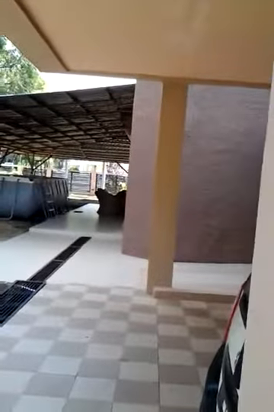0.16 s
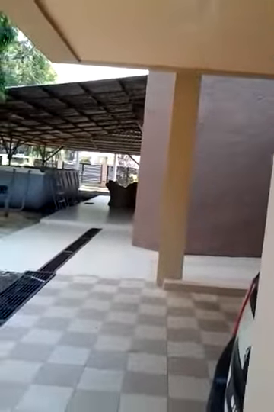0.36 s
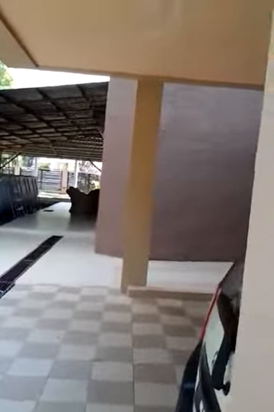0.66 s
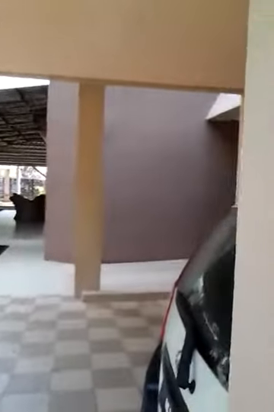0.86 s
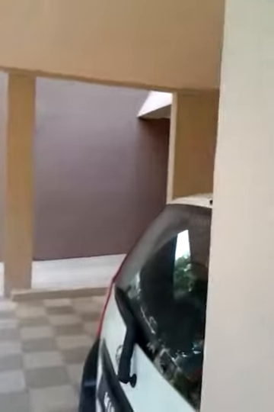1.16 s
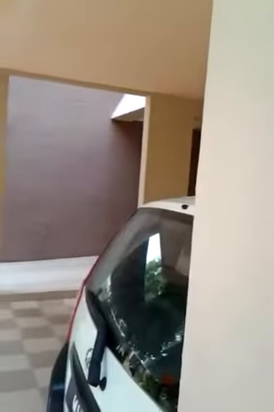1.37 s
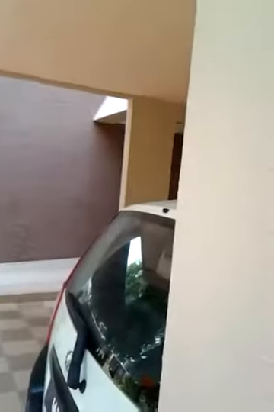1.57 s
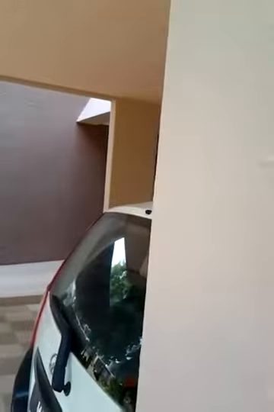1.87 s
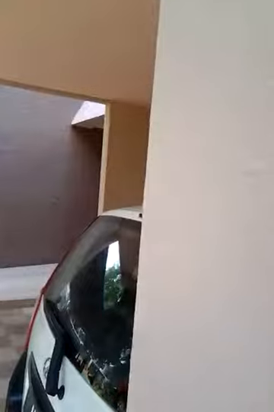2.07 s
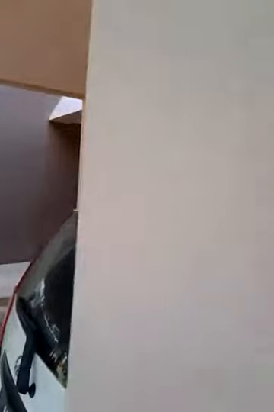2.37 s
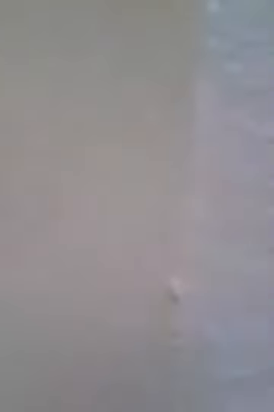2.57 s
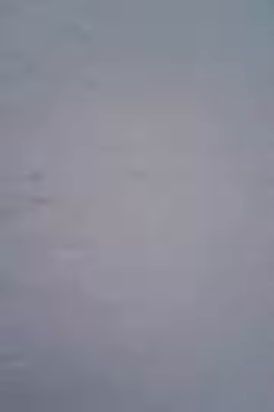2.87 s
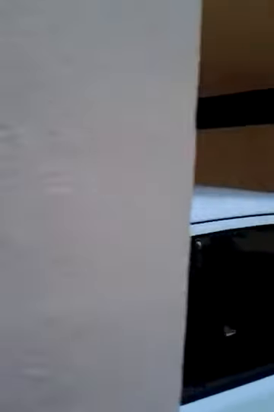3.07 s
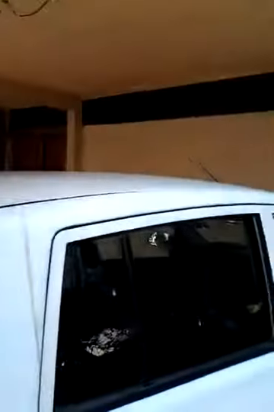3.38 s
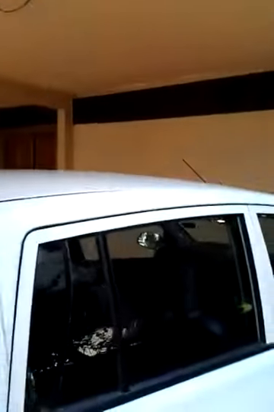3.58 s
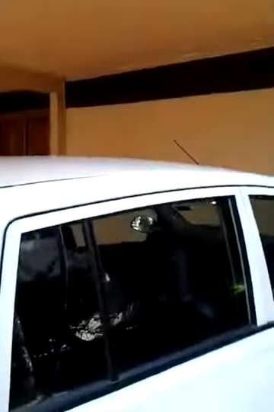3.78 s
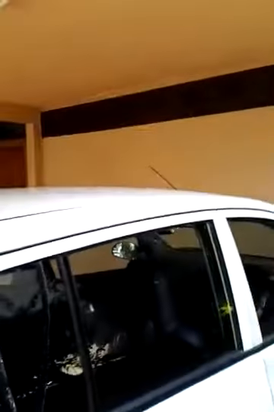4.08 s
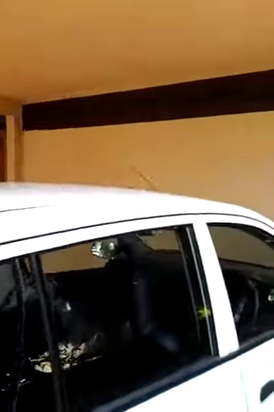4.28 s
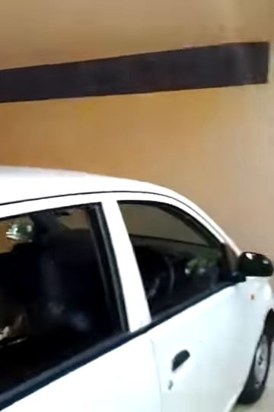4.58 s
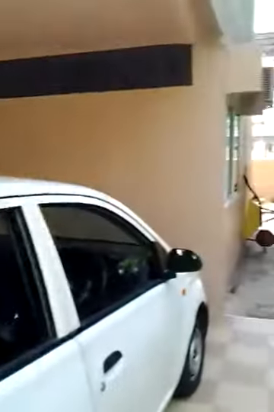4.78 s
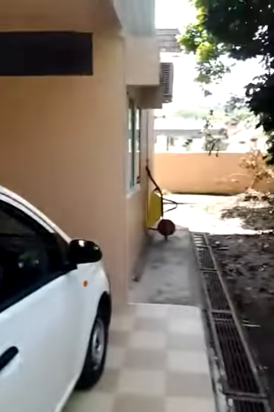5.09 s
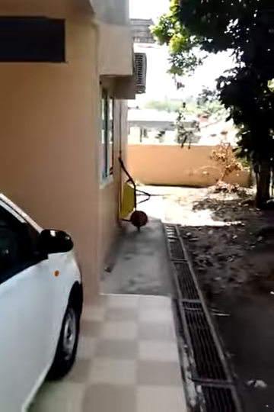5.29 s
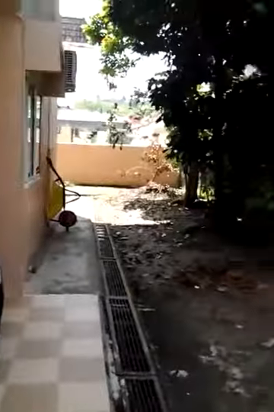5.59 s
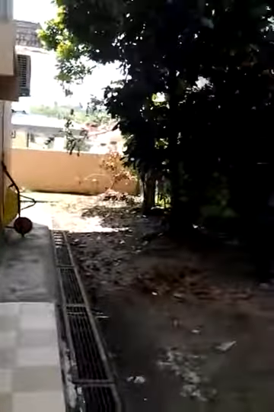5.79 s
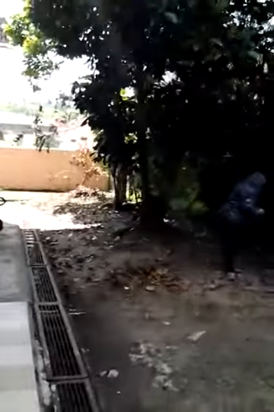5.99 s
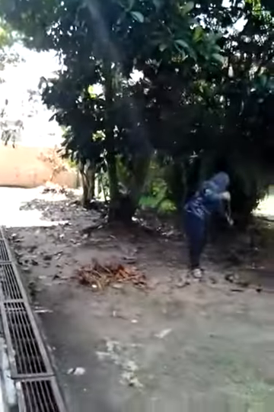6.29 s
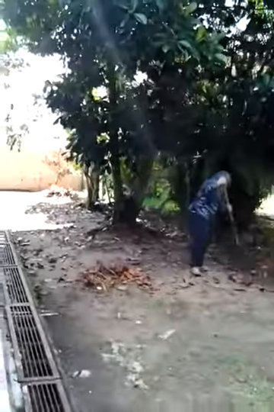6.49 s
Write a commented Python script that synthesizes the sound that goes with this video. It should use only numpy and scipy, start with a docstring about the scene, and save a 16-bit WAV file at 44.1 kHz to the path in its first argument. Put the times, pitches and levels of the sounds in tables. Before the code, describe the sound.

A wire rake is pulled through dry leaves on hard dirt, heard at some distance from a tiled carport by a handheld stereo microphone. A strong crackling scrape is already under way at 0 seconds, with knocks and twig snaps until about 0.35, then leaves settle with small clicks. After a faint scratch near 0.6, a firm stroke at 1.0 to 1.2 ends in a sharp snap and a tiny, quickly dying ring of wires on stone. Further scrapes come near 1.9 and 2.7, with a weak one at 3.2. From 3.65 strokes crowd closer, with tine clatter at 3.9, hard snaps at 4.4 and a longer drag at 4.75. Short crunchy strokes follow at 5.05, 5.35 and 5.5, then a lull, then a last scrape from about 6.2 with a closing snap at 6.5. Hollow low rubbing, short reflections and faint smooth yard hiss lie underneath.

```python
"""Dry leaves crackle and fizz as a wire rake is dragged through them in strokes over hard dirt.
Tines chatter, twigs snap and struck wires ring: random clicks and short dying tones make these sounds.
Bumps in the dirt shake the rake and a hollow under the heap, through resonances that can glide.
Reflections of a tiled carport blur it all, over a faint far yard hiss made of smooth noise.
The handheld two-port microphone turns slowly towards the rake."""
import sys
import numpy as np
from scipy import signal
from scipy.fft import rfft, irfft
from scipy.io import wavfile
from scipy.ndimage import uniform_filter1d, map_coordinates

SR = 44100
rng = np.random.default_rng(int(sys.argv[2]) if len(sys.argv) > 2 else 0)


def output_pcm(signal):
    """Save a mono or channel-first signal as 16-bit PCM at the path in sys.argv[1].

    Samples are clipped to [-1, 1] before scaling.
    """
    pcm = np.clip(np.atleast_2d(signal).T, -1, 1) * 32767
    wavfile.write(sys.argv[1], SR, np.round(pcm).astype(np.int16))


N = 292824  # length in samples
STEP = 32  # stroke envelopes are worked out once every 32 samples

# Pulls of the rake through the leaves, with levels before mixing.
# Each row: start in seconds, rise in seconds, hold in seconds, crackle level in dB, swell over the hold
# in dB, tine chatter against crackle in dB, leaf crispness against crackle in dB.
LEAF_STROKES = [(0.0, 0.023, 0.13, -29.5, 0.5, -4, -13.5), (0.126, 0.011, 0.0042, -33, 7, -11, -12),
                (0.58, 0.095, 0.0059, -48, -6, 5.5, -10), (1.035, 0.024, 0.12, -32, 4.5, -4.5, -12.5),
                (1.536, 0.027, 0.0092, -43, -3, -6, -13), (1.893, 0.0049, 0.21, -35, -3.5, -2.5, -14),
                (1.937, 0.1, 0.19, -33.5, -7.5, -5, -9), (2.394, 0.047, 0.018, -46.5, 2, -4, -18),
                (2.634, 0.1, 0.14, -33.5, 5.5, -9.5, -8), (3.166, 0.031, 0.16, -46, -6.5, -2, -16),
                (3.652, 0.012, 0.07, -39.5, 10, -3.5, -10.5), (3.829, 0.0041, 0.022, -36.5, 1.5, -24, -15),
                (4.038, 0.11, 0.074, -36.5, -4, -5, -8), (4.236, 0.062, 0.19, -35, -9, -10, -10.5),
                (4.393, 0.021, 0.032, -34.5, -20, 8.5, -24), (4.716, 0.058, 0.19, -33, 4, -10, -13),
                (5.034, 0.036, 0.0098, -49, -13, 16, -20), (5.331, 0.0042, 0.025, -27, -8.5, -5, -8.5),
                (5.49, 0.011, 0.025, -30, -1, -12, -8), (5.818, 0.024, 0.0099, -52.5, -4.5, 0, 0.5),
                (6.171, 0.0057, 0.11, -42.5, 2, -18, -9.5), (6.236, 0.056, 0.17, -32, 5.5, -2, -10.5)]
# After a pull the leaves settle slowly: rise in dB, quick fall in dB per second,
# level of the settling in dB, its slow fall in dB per second.
LEAF_SHAPE = (14, 80, -17, 29.5)
# Sound colour of the leaf crackle. Each row: frequency in Hz, level in dB per Hz.
LEAF_SPECTRUM = [(350, -23), (600, -3), (859, -2.5), (1020, -5.5), (1170, -2.5), (1280, -1), (2090, 0),
                 (2870, 0), (4110, 3.5), (7500, -16), (9750, -30), (16500, -120)]
# Sound colour of the crisp leaf fizz. Each row: frequency in Hz, level in dB per Hz.
FIZZ_SPECTRUM = [(3240, -4.5), (5500, 4.5), (7000, -4), (8120, -5), (9550, -6.5), (11000, -9.5),
                 (12800, -7.5), (15700, -32)]
# Resonances of the tines. Each row: pitch in Hz, width in Hz, level in dB.
TINE_MODES = [(1270, 470, 2.5), (1610, 240, 1), (1853, 233, 2.5), (2062, 130, 1.5), (3700, 350, -0.5)]

# The rake head dragging on dirt, with levels before mixing.
# Each row: start in seconds, rise in seconds, hold in seconds, level in dB, swell over the hold in dB,
# hollow resonance at the start in Hz, its glide in Hz per second.
DRAG_STROKES = [(0.0, 0.00087, 0.15, -33, 1, 461, 100), (0.123, 0.044, 0.18, -37, -8.5, 463, -500),
                (0.894, 0.013, .13, -50, 16, 435, 48), (1.059, 0.012, 0.11, -39, 9.5, 437, 298),
                (1.871, 0.047, 0.072, -31.5, 3.5, 440, 114), (2.006, 0.016, 0.073, -39, -1.5, 440, -300),
                (2.624, 0.057, 0.27, -38.5, 1.5, 455, -100), (3.61, 0.027, 0.17, -45, 6, 480, -200),
                (4.068, 0.076, 0.013, -43.5, 0.5, 386, -100), (4.247, 0.078, 0.14, -37.5, -8.5, 446, -100),
                (4.408, 0.034, 0.041, -46, 2.5, 320, -700), (4.684, 0.02, 0.24, -45.5, 5.5, 247, 300),
                (5.039, 0.031, 0.055, -33, -5.5, 393, -1600), (5.365, 0.04, 0.0087, -40.5, -5, 464, -59.5),
                (5.497, 0.016, 0.096, -47.5, 5, 470, -500), (6.133, 0.22, 0.13, -43.5, 6.5, 410, 1)]
DRAG_SHAPE = (18.5, 156, -14.5, 67)  # same order as LEAF_SHAPE
# Resonances of the handle and head. Each row: pitch in Hz, width in Hz, level in dB.
BODY_MODES = [(204.3, 11.2, -3.5), (375.1, 7.8, 4), (463, 124, -3.5), (577, 70, -6), (798, 130, 0.5)]

# Snaps and knocks, with levels before mixing. Each row: start in seconds, level in dB, pitch in Hz,
# time for the ring to fall 60 dB in seconds, crack of leaf bits against the snap level in dB.
SNAP_EVENTS = [(0.078, -19, 514, 0.033, -20), (0.093, -18, 520, 0.027, -3.5),
               (0.141, -9.5, 2400, 0.024, -4.5), (0.172, -16, 485, 0.014, -26),
               (0.213, -34, 4060, 0.014, -17), (0.268, -13, 1680, 0.02, -13),
               (0.281, -15.5, 1860, 0.011, -5), (0.302, -15, 1430, 0.015, -12),
               (0.318, -15, 2200, 0.024, -2.5), (0.46, -18, 860, 0.009, -19),
               (0.468, -17, 810, 0.015, -4.5), (0.517, -34.5, 950, 0.024, 7.5),
               (0.679, -25.5, 1250, 0.014, -7), (0.697, -25, 1860, 0.016, -12),
               (0.713, -31, 1690, 0.022, -15), (0.94, -38, 470, 0.032, -27), (0.972, -30, 500, 0.023, -12),
               (0.995, -24.5, 497, 0.015, -13), (1.013, -23, 474, 0.017, -9.5),
               (1.033, -20.5, 440, 0.017, -11), (1.043, -18, 4200, 0.0081, -18),
               (1.101, -20, 450, 0.02, -13), (1.134, -23, 480, 0.0078, -17), (1.163, -13, 463, 0.029, -27),
               (1.176, -2, 3590, 0.017, -18), (1.369, -21.5, 2050, 0.015, -4),
               (1.765, -38.5, 402, 0.047, 1), (1.907, -11, 4220, 0.011, -24), (1.92, -27, 400, 0.053, -22),
               (1.962, -22.5, 470, 0.047, -27), (2.028, -14, 1723, 0.016, -17),
               (3.649, -22, 1060, 0.014, -12), (3.885, -12, 2120, 0.0099, -27),
               (3.884, -21, 1490, 0.017, -25), (3.894, -23.5, 1820, 0.038, -26),
               (3.9, -23, 1750, 0.02, -24), (3.913, -19, 1684, 0.032, -9), (3.928, -24, 1830, 0.022, -28),
               (3.931, -17, 1600, 0.024, -22), (3.937, -18, 1920, 0.022, -3.5),
               (4.089, -25, 1120, 0.0087, -0.5), (4.137, -23.5, 720, 0.022, -2.5),
               (4.141, -17.5, 1270, 0.022, -22), (4.409, -8, 1880, 0.009, -14),
               (4.424, -4.5, 1770, 0.0071, -15.5), (4.727, -29, 820, 0.011, 1.5),
               (4.783, -21.5, 1980, 0.026, -5), (4.803, -22, 3700, 0.025, -18),
               (4.83, -29, 3550, 0.017, -11), (4.866, -13, 4440, 0.012, -14), (4.957, -24, 1170, 0.02, -8),
               (5.047, -24, 3730, 0.012, 1), (5.053, -21, 2040, 0.03, -8), (5.054, -26, 605, 0.027, -25),
               (5.333, -19, 1840, 0.018, -2.5), (5.408, -29.5, 3900, 0.016, 6.5),
               (5.5, -27, 560, 0.037, -16), (5.506, -17.5, 1800, 0.014, -12), (5.862, -26, 3370, 0.018, -8),
               (6.25, -35, 440, 0.059, -29), (6.279, -26, 2300, 0.021, -15), (6.325, -29, 390, 0.047, -22),
               (6.371, -34, 370, 0.19, -25), (6.409, -25, 450, 0.049, -22), (6.505, -1, 1420, 0.006, -28)]
# Tines striking a stone. Each row: start in seconds, level in dB before mixing.
STONE_STRIKES = [(1.178, -22), (1.188, -24), (1.212, -35), (1.232, -28), (1.265, -25)]
# Ringing of the struck wires, before a random change at each blow.
# Each row: pitch in Hz, level in dB, time to fall 60 dB in seconds.
WIRE_MODES = [(2120, -2.5, 0.054), (2960, -8, .07), (2736, 2.5, 0.035), (3545, -2, 0.049),
              (3710, -6, 0.049), (4070, -18, 0.05)]
# Dry bright ticks of a tine or a brittle leaf.
# Each row: start in seconds, level in dB before thinning, time to fall 60 dB in seconds.
TICK_EVENTS = [(0.028, -24.5, 0.033), (1.0442, -18.5, 0.02), (1.058, -23, .02), (1.0823, -22, 0.012),
               (1.107, -21, 0.013), (1.187, -16, 0.025), (1.3662, -18, 0.016), (1.908, -27, 0.02),
               (1.961, -21.5, .015), (2.699, -37, .015), (3.155, -28, 0.04), (3.669, -25, 0.018),
               (3.886, -36, 0.017), (4.279, -29, 0.018), (4.731, -34.5, 0.019), (5.337, -26, 0.017),
               (5.508, -29, 0.018)]
# Sound colour of the ticks. Each row: frequency in Hz, level in dB per Hz.
TICK_SPECTRUM = [(300, -50), (2000, 4.5), (4500, 13.5), (7000, -9), (10000, -20), (15000, -40)]

# How long the carport rings. Each row: frequency in Hz, time to fall 60 dB in seconds.
CARPORT_DECAY = [(200, 0.24), (1000, 0.13), (4000, 0.4), (12000, 0.28)]
# Sound colour of the yard. Each row: frequency in Hz, level in dB per Hz before the whole is leveled.
YARD_SPECTRUM = [(12, -44), (20, -10), (59, -21.5), (181, -1.5), (353, 2.5), (508, -0.5), (2110, -3.5),
                 (2780, -10), (3890, -6), (7390, -23), (8030, -27), (8730, -20), (12900, -20), (15700, -28)]
YARD_DB = -49.5  # overall yard level

# How alike the diffuse sound is at the two ports. Each row: frequency in Hz, likeness from -1 to 1.
PORT_LIKENESS = [(60, -0.53), (150, 0.82), (380, 0.76), (950, 0.036), (2380, 0.28), (5980, -0.1),
                 (15000, 0.42)]
# How far ahead the left port hears the rake. Each row: time in seconds, lead in milliseconds.
LEFT_LEAD = [(0, 0.12), (3.5, 0.12), (6.64, 0.064)]
# The microphone turns. Each row: time in seconds, left-right level difference in dB.
TURN_PAN = [(0, -1.3), (2.5, -1), (3.5, -0.5), (4.2, 0.5), (4.8, -0.8), (6.64, 0)]
# Difference in colour between the ports. Each row: frequency in Hz, left-right difference in dB.
PORT_BALANCE = [(60, -4), (180, 1.5), (550, 1.5), (1650, 3.5), (4970, 1), (15000, -2.5)]
EDGE_HZ = 15800  # top of the band that is let through


def leaves():
    """Breaking leaves crackle and fizz, and skipping tines chatter, along each stroke."""
    pulls = np.array([pull(*row[:5], *LEAF_SHAPE) for row in LEAF_STROKES])
    tine_db, crisp_db = np.transpose(LEAF_STROKES)[5:]
    cracks = clicks(3500, spread_db=2.0, clump_db=2.5, clump_s=0.025)
    skips = clicks(1500, spread_db=3.5, clump_db=0.5, clump_s=0.027)
    crackle = filled(pulls.sum(axis=0)) * colour(grains(cracks, 5.5), LEAF_SPECTRUM)
    fizz = filled(gain_of(crisp_db) @ pulls) * colour(cracks, FIZZ_SPECTRUM)
    chatter = filled(gain_of(tine_db) @ pulls) * ring(skips, TINE_MODES)
    return crackle + fizz + chatter


def drag():
    """Small bumps in the dirt shake the rake body and the hollow under the heap of leaves."""
    pulls = np.array([pull(*row[:5], *DRAG_SHAPE) for row in DRAG_STROKES])
    # the loudest pull at each moment sets the hollow
    start, *_, hz, glide = np.transpose(DRAG_STROKES)[:, pulls.argmax(axis=0)]
    glide_s = np.clip(np.arange(0, N, STEP) / SR - start, 0, .3)
    hollow_hz = filled(np.maximum(hz + glide * glide_s, 200))
    bumps = clicks(2000, spread_db=1.5, clump_db=1.6, clump_s=0.01)
    body = 1.01 * ring(bumps, BODY_MODES)
    hollow = resonate(bumps, hollow_hz, 166)
    overtone = 0.53 * resonate(bumps, 2.08 * hollow_hz, 150)
    return filled(pulls.sum(axis=0)) * evened(body + hollow + overtone)


def snaps():
    """Each snap is a short pitched ring with a noisy crack of broken leaf bits."""
    out, t = np.zeros(N), np.arange(3000) / SR
    grit = rng.standard_normal(N)
    bits, fizz = colour(grit, LEAF_SPECTRUM), colour(grit, FIZZ_SPECTRUM)
    for s, db, hz, t60, crack_db in SNAP_EVENTS:
        at = round(s * SR)
        tone = np.sin(2 * np.pi * hz * t)
        if hz > 600:  # higher snaps also have a weak lower tone
            tone = tone + 0.15 * np.sin(2 * np.pi * 0.564 * hz * t)
        crack = bits[at:at + len(t)] * gain_of(crack_db - 60 * t / 0.04)
        # the bright part is weaker but lasts longer
        crack += fizz[at:at + len(t)] * gain_of(crack_db - 19 - 60 * t / 0.058)
        ringing = tone * gain_of(-60 * t / max(t60, .004))
        soft_start = 1 - np.exp(-t / 0.0012)
        out[at:at + len(t)] += gain_of(db) * (ringing + crack) * soft_start
    return out


def strikes():
    """Struck wires ring as dying tones, with slightly different pitches and levels at each blow."""
    out, t = np.zeros(N), np.arange(12000) / SR
    chances = rng.standard_normal((len(STONE_STRIKES), len(WIRE_MODES)))
    for (s, db), chance in zip(STONE_STRIKES, chances):
        wires = np.zeros(len(t))
        for (hz, wire_db, t60), c in zip(WIRE_MODES, chance):
            tone = np.sin(2 * np.pi * hz * (1 + 0.0084 * c) * t)
            wires += gain_of(wire_db + 2.0 * c - 60 * t / t60) * tone
        out[round(s * SR):][:len(t)] += gain_of(db) * wires
    return out


def ticks():
    """Each tick is a burst of bright noise that starts at once and quickly dies away."""
    envelope, t = np.zeros(N), np.arange(2000) / SR
    for s, db, t60 in TICK_EVENTS:
        envelope[round(s * SR):][:len(t)] += gain_of(db - 60 * t / max(t60, .003))
    return envelope * colour(rng.standard_normal(N), TICK_SPECTRUM)


def carport(x, count=8):
    """Rake and listener move, so the sound passes through one set of reflections after another."""
    place = np.arange(N) / SR / .11  # a new set every 110 ms, returning to the first after the last
    out = np.zeros((2, N))
    for k in range(count):
        apart = (place - k + count / 2) % count - count / 2
        fade = np.cos(np.pi / 2 * np.clip(apart, -1, 1))
        out += signal.oaconvolve(x[None] * fade, reflections(), axes=1)[:, :N]
    return out


def reflections():
    """Sparse reflections off walls, tiles and car, each band dying at its own speed."""
    taps = np.zeros((2, SR // 2))
    # one reflection at a random place in every 20 samples
    at = np.arange(60, SR // 2 - 20, 20) + rng.integers(0, 20, (2, (SR // 2 - 61) // 20))
    np.put_along_axis(taps, at, rng.choice([-1., 1.], at.shape), 1)
    hz, t, z = signal.stft(taps, SR, nperseg=256)
    decay = gain_of(-60 * t / read(CARPORT_DECAY, hz)[:, None])
    tail = signal.istft(pair(*z, hz) * decay, SR, nperseg=256)[1]
    return tail / np.linalg.norm(tail, axis=1)[:, None]


def yard():
    """Far traffic and leaves in the air: smooth noise with faint drifting patches."""
    hz = np.fft.rfftfreq(1024, 1 / SR)
    a, b, c, d, patches = rng.standard_normal((N // 256 + 5, 513, 5)).T
    patches = uniform_filter1d(patches, size=12, axis=0)  # smooth across frequency
    patches = evened(uniform_filter1d(patches, size=14, axis=1))  # then across time
    level_db = read(YARD_SPECTRUM, hz)[:, None] + 1.4 * patches
    z = pair(a + 1j * b, c + 1j * d, hz) * gain_of(level_db)
    noise = signal.istft(z, nperseg=1024, noverlap=768)[1][:, :N]
    return gain_of(YARD_DB) * evened(noise)


def clicks(per_s, spread_db, clump_db, clump_s):
    """Random clicks, a few of them large, growing louder in clumps that start sharply and fade."""
    size = gain_of(spread_db * np.minimum(rng.exponential(1, N), 5)) * rng.choice([-1., 1.], N)
    starts = rng.exponential(1, N) * (rng.random(N) < 1 / (clump_s * SR))
    clumps = signal.lfilter([1], [1, -np.exp(-1 / (clump_s * SR))], starts)
    return size * (rng.random(N) < per_s / SR) * gain_of(clump_db * np.minimum(clumps, 4))


def grains(x, cycles, count=14):
    """Each click becomes a short burst at one of several pitches, as leaves differ in size."""
    kind, out = rng.integers(0, count, N), np.zeros(N)
    for k, hz in enumerate(np.geomspace(600, 7500, count)):
        turns = np.arange(0, cycles, hz / SR)
        burst = np.sin(np.pi * turns / cycles) ** 2 * np.sin(2 * np.pi * turns)
        # scaled so that every pitch is equally strong per Hz
        out += signal.oaconvolve(x * (kind == k), burst * hz / SR)[:N]
    return out


def ring(x, modes):
    """Each click sets a few damped resonances ringing, with a soft start."""
    t = np.arange(3000) / SR
    taps = np.zeros(len(t))
    for hz, width, db in modes:
        swell_and_fade = width ** 1.9 * t * np.exp(-2 * np.pi * width * t)
        taps += gain_of(db) * swell_and_fade * np.sin(2 * np.pi * hz * t)
    return evened(signal.oaconvolve(x, taps)[:N])


def resonate(x, hz, width):
    """A moving resonance: shift its pitch down to zero, smooth twice, shift back."""
    turn, r = np.exp(2j * np.pi * np.cumsum(hz) / SR), np.exp(-np.pi * width / SR)
    smooth = signal.lfilter([1], [1, -2 * r, r * r], x / turn + 1e-18)
    return evened((turn * smooth).real)


def pull(start, rise, hold, db, swell_db, rise_db, fall_db, settle_db, slow_db):
    """Gain of one pull: rise, hold with a swell, quick fall, and a faint slow settling."""
    t = np.arange(0, N, STEP) / SR - start
    after = np.maximum(t - rise - hold, 0)
    shape_db = np.interp(t, [0, rise, rise + hold], [db - rise_db, db, db + swell_db])
    fall = gain_of(-fall_db * after) + gain_of(settle_db - slow_db * after)
    return (t >= 0) * gain_of(shape_db) * fall


def filled(curve):
    """Spreads a coarse envelope over every sample."""
    return np.interp(np.arange(N), np.arange(0, N, STEP), curve)


def colour(x, points):
    """Gives a sound the wanted spectrum with a filter that never responds ahead of its input."""
    level_db = read(points, abs(np.fft.fftfreq(4096, 1 / SR)))
    log_gain = np.log(gain_of(np.maximum(level_db, -100)))
    # minimum phase puts the filter's energy as early as possible
    taps = np.fft.ifft(np.exp(np.conj(signal.hilbert(log_gain)))).real[:2048]
    return evened(signal.oaconvolve(x, taps)[:N])


def pair(a, b, hz):
    """Mixes two spectra so the ports are as alike at each frequency as PORT_LIKENESS says."""
    same = np.clip(read(PORT_LIKENESS, hz), -1, 1)[:, None]
    return np.array([a, same * a + np.sqrt(1 - same ** 2) * b])


def ports(x, lead_ms):
    """Sound reaches the first port lead_ms milliseconds before the second."""
    late = np.arange(N) - lead_ms * SR / 1000
    return np.array([x, map_coordinates(x, [late], order=3)])


def read(points, hz):
    """Reads a table of values on a log-frequency axis."""
    f, value = np.transpose(points)
    return np.interp(np.log(hz + 1), np.log(f + 1), value)


def gain_of(db):
    """Turns decibels into amplitude."""
    return 10 ** (np.asarray(db) / 20)


def evened(x):
    """Scales to an average (rms) level of 1."""
    return x / np.sqrt(np.mean(x ** 2) + 1e-20)


def scene():
    """Adds direct sound, the diffuse carport and the yard."""
    t = np.arange(N) / SR
    thin = signal.butter(6, 165, "high", fs=SR, output="sos")  # small sources give out no bass
    sources = [leaves() + drag(), snaps() + strikes(), leaves(), ticks()]
    scrape, hits, far, bright = signal.sosfilt(thin, sources)
    lead_ms = np.interp(t, *np.transpose(LEFT_LEAD))
    direct = ports(gain_of(-6.5) * scrape + hits + bright, lead_ms)
    # leaves at the far end of the heap reach the right port first
    scattered = gain_of(-8.5) * ports(far, np.full(N, .2))[::-1]
    wet = gain_of(-4.0) * carport(scrape + gain_of(2.0) * hits)
    pan_db = np.interp(t, *np.transpose(TURN_PAN))
    return (direct + scattered + wet) * gain_of([pan_db / 2, -pan_db / 2]) + yard()


def record(dry):
    """The ports differ a little in colour, and the highest treble is cut off."""
    tilt_db = read(PORT_BALANCE, np.fft.rfftfreq(N, 1 / SR)) / 2
    tilted = irfft(rfft(dry) * gain_of([tilt_db, -tilt_db]), N)
    low_pass = signal.firwin(511, EDGE_HZ, window=("kaiser", 9), fs=SR)
    return signal.oaconvolve(tilted, low_pass[None], "same")


dry = scene()
out = record(dry)
output_pcm(out)
```